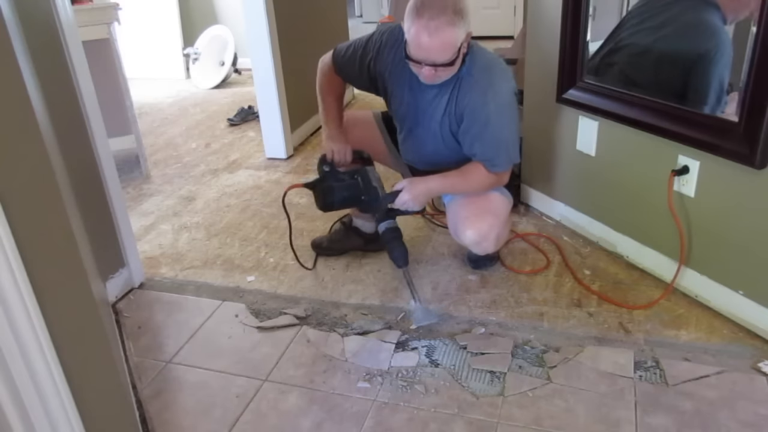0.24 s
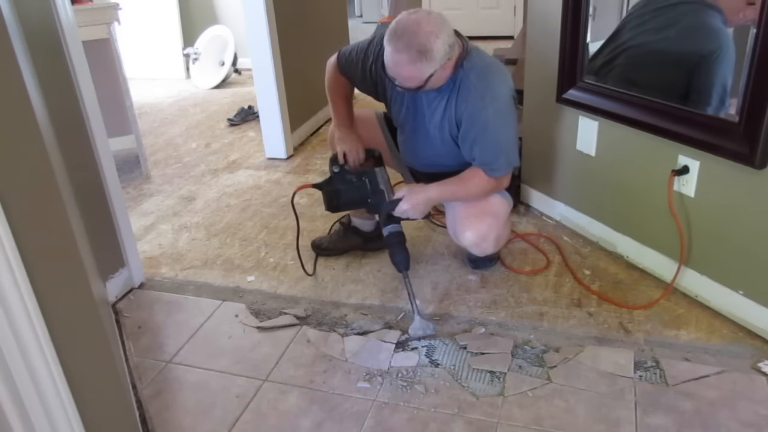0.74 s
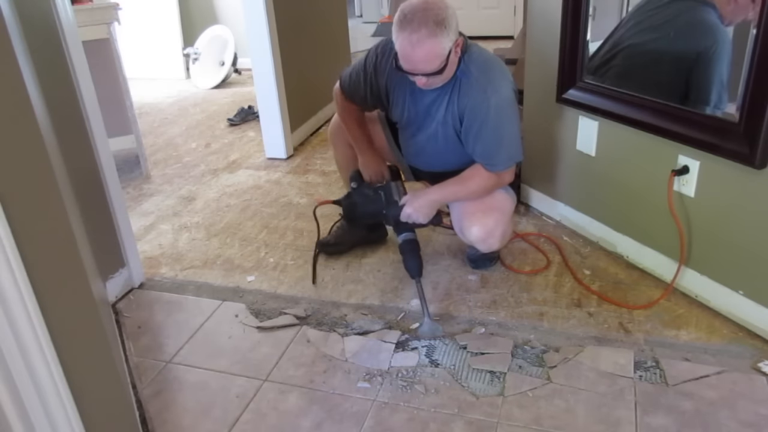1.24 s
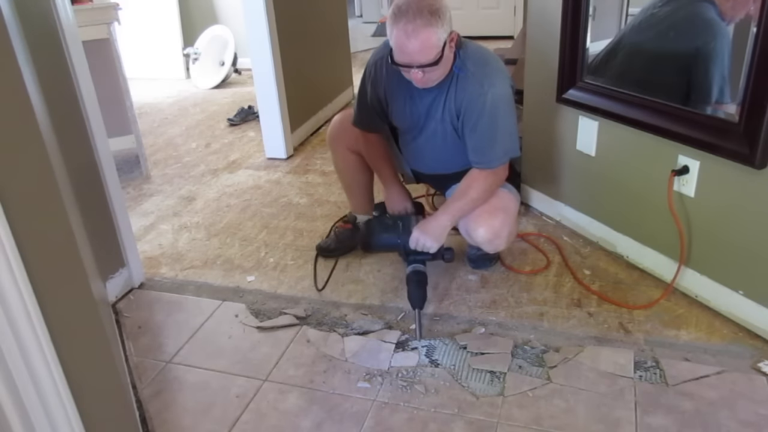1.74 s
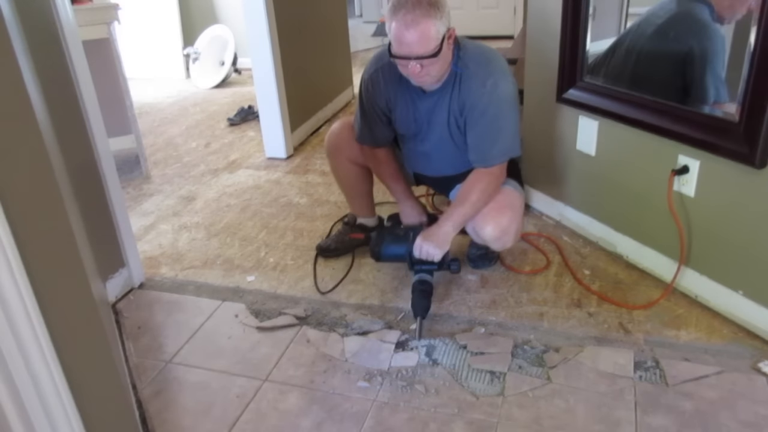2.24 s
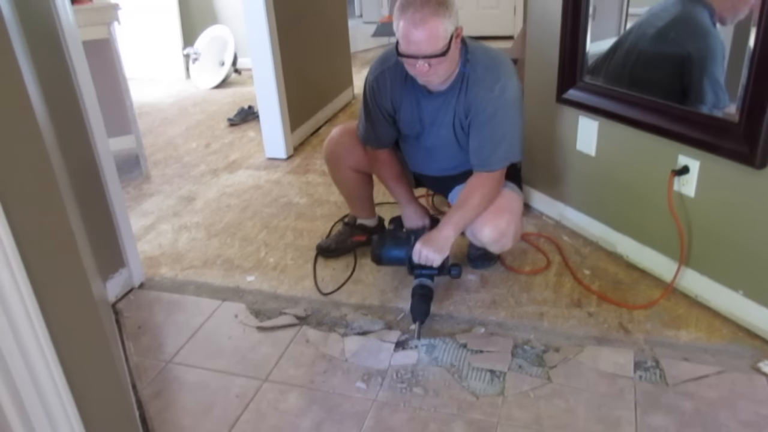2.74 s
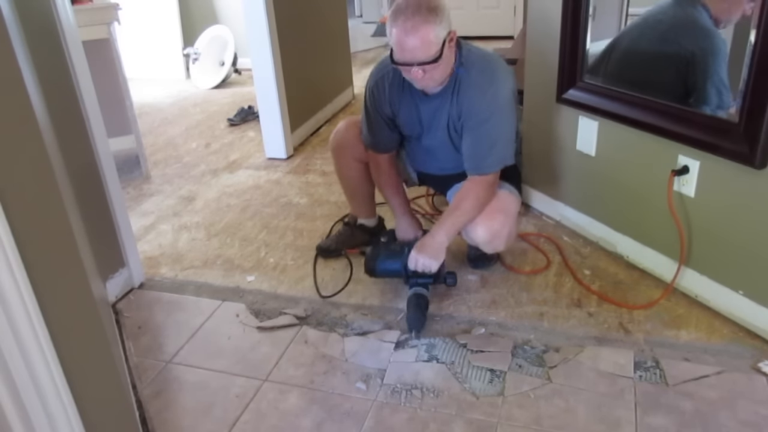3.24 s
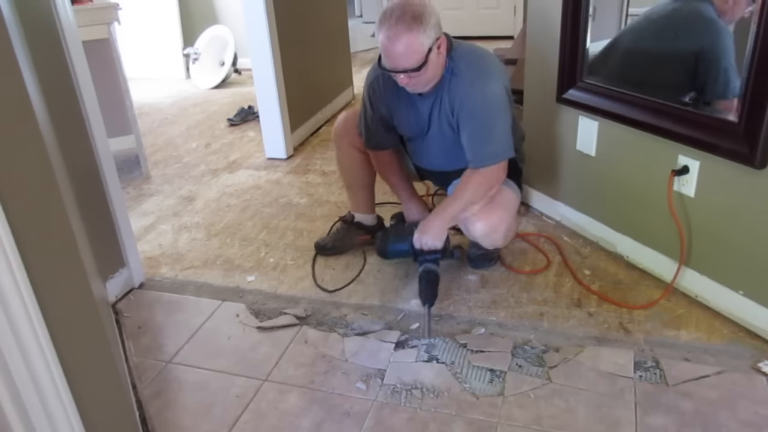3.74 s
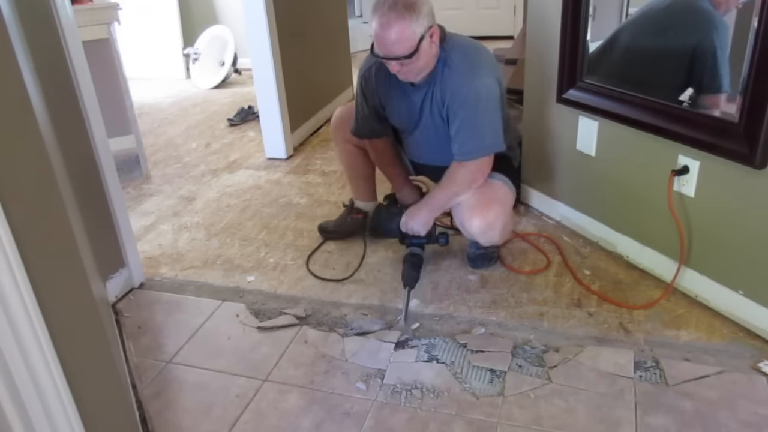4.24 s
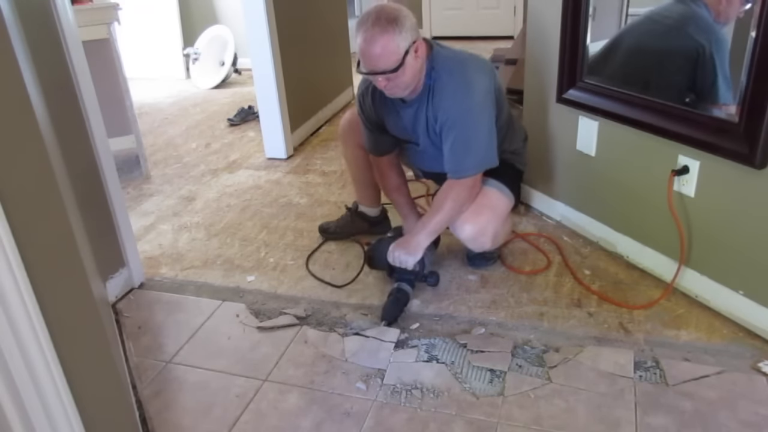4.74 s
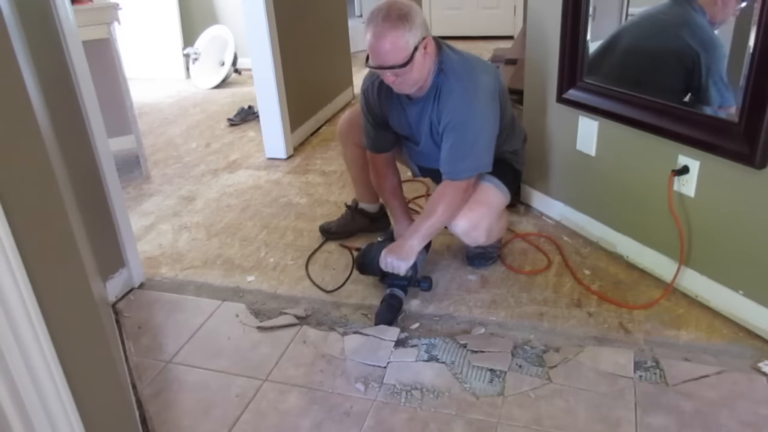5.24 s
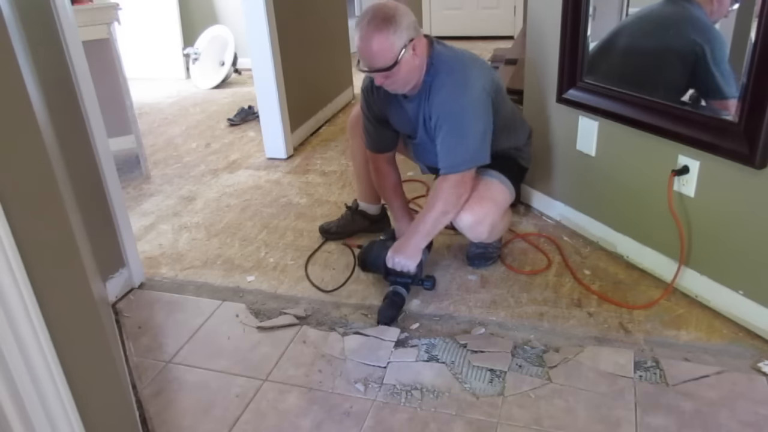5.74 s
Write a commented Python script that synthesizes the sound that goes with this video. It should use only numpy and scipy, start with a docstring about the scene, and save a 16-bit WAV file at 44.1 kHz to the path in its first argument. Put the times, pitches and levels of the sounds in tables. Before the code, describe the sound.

A whining power hammer starts, idles, and twice hammers rapidly into floor tile with booming, cracking and ringing steel, indoors.

```python
"""Shoes shuffle in a bare tiled room and one drags over grit; hard shards clack, with a dull thud under each.
Then the motor of an electric demolition hammer spins up, whirring, hissing and whining, and keeps running.
Twice the chisel bites, about 47 blows a second: the blows boom in the slab, crack tile and ring the steel.
Noise shaped by frequency makes air, grit, motor and rubble; sine tones make whine and drumming; sharp
impulses through resonances make the clacks, the snaps and, with noise, the ringing steel."""
import sys
import numpy as np
from scipy import signal
from scipy.fft import rfft, irfft, next_fast_len
from scipy.io import wavfile
from scipy.ndimage import uniform_filter1d, map_coordinates

SR = 44100
rng = np.random.default_rng(int(sys.argv[2]) if len(sys.argv) > 2 else 0)


def materialize(psi):
    """Save the field psi as 16-bit PCM at rate SR to the path in sys.argv[1].

    A 1-D psi becomes a single channel; in a 2-D psi each row is a channel.
    """
    bounded = np.clip(np.atleast_2d(psi).T, -1, 1)
    quanta = np.round(bounded * 32767).astype(np.int16)
    wavfile.write(sys.argv[1], SR, quanta)


N = 263718  # length in samples
TIME = np.arange(N) / SR  # seconds


def amp(db):
    """Turn dB into a plain gain."""
    return 10 ** (np.asarray(db) / 20)


def unit(x):
    """Scale x to an rms of 1."""
    return x / np.sqrt(np.mean(x ** 2) + 1e-20)


def noise():
    """White noise for the whole scene."""
    return rng.standard_normal(N)


def along(points, hz):
    """Read a curve of (Hz, value) points on a log frequency axis."""
    point_hz, values = np.transpose(points)
    return np.interp(np.log(hz + 1), np.log(point_hz + 1), values)


def curves(rows, outside=None):
    """Join the rows with straight lines: one curve for each column after the time."""
    s, *columns = np.transpose(rows)
    return [np.interp(TIME, s, column, outside, outside) for column in columns]


def wobble(rate):
    """A smooth random curve with `rate` random knots a second."""
    coarse = np.arange(0, N + 32, 32)
    knots = rng.standard_normal(int(N * rate / SR) + 4)
    smooth = map_coordinates(knots, [coarse * rate / SR])
    return np.interp(np.arange(N), coarse, smooth)


def swell(s, db, rise, fall):
    """A gain that climbs to db at s seconds and falls away, at rates in dB a second."""
    late = TIME - s
    return amp(db - np.where(late < 0, -rise * late, fall * late))


def filtered(x, response):
    """Multiply the spectrum of x by a response, a function of Hz."""
    size = next_fast_len(len(x) + SR // 2)
    hz = np.fft.rfftfreq(size, 1 / SR)
    return irfft(rfft(x, size) * response(hz), size)[:len(x)]


def coloured(x, spectrum):
    """Shape x by (Hz, dB) points, then scale it to an rms of 1."""
    return unit(filtered(x, lambda hz: amp(along(spectrum, hz))))


def ringing(x, modes):
    """Pass x through resonances side by side, with alternating sign; each is (Hz, width in Hz, dB)."""
    def response(hz):
        total = 0
        for k, (centre, width, db) in enumerate(modes):
            damping = 1j * hz * width
            total = total + (-1) ** k * amp(db) * damping / (centre * centre - hz * hz + damping)
        return total
    return filtered(x, response)


def struck(blows, shape):
    """Let every blow set off the same shape."""
    return signal.fftconvolve(blows, shape)[:N]


def burst(t60):
    """Noise that dies away by 60 dB in t60 seconds, scaled to an energy of 1."""
    t = np.arange(SR // 2) / SR
    x = amp(-60 * t / t60) * rng.standard_normal(len(t))
    return x / np.linalg.norm(x)


# The colour of the quiet room's air. Each row: frequency in Hz, relative level in dB per Hz.
AIR_COLOUR = [(15, -29), (25, -10), (49, -27), (225, -10.5), (734, -10), (1130, -9), (1430, -10.5),
              (9380, -33), (15200, -47)]
# Low bumps that reach the microphone. Each row: time in seconds, level in dB.
LOW_BUMPS = [(0.08, -35), (0.3, -37.5), (0.72, -39.5), (0.98, -49), (1.63, -44), (3.55, -34)]
BUMP_RISE_DB_PER_S, BUMP_FALL_DB_PER_S, RUMBLE_DB = 122, 93, -67
SHAKE_DB, SHAKE_FOLLOWS = -27.5, 0.44  # low shaking, and the power of the slab's boom that it follows


def background(boom):
    """Room air and low rumble: steady noise, plus deep noise that swells with bumps and the slab's boom."""
    deep_colour = [(12, -32), (25, -10.5), (60, -2.0), (110, -12), (200, -14), (400, -120)]  # Hz, dB
    deep = coloured(noise(), deep_colour)
    size = amp(RUMBLE_DB) + amp(SHAKE_DB) * boom ** SHAKE_FOLLOWS
    for s, db in LOW_BUMPS:
        size += swell(s, db, BUMP_RISE_DB_PER_S, BUMP_FALL_DB_PER_S)
    return amp(-43.5) * coloured(noise(), AIR_COLOUR) + size * deep


# The colour of grit under a shoe. Each row: frequency in Hz, relative level in dB per Hz.
GRIT_COLOUR = [(88, -41), (150, -10), (238, -11), (371, -17), (486, -11), (1600, -7.5), (1730, -8),
               (2310, -13.5), (2810, -16.5), (15000, -46.5)]
SCUFF_S, SCUFF_DB, SHUFFLE_DB = 0.273, -23, -45  # one drag of a shoe, over light shuffling until then
SCUFF_RISE_DB_PER_S, SCUFF_FALL_DB_PER_S = 356, 188


def scuff():
    """A shoe drags grit: noise in clumps stands for the many grains that scrape."""
    drag = swell(SCUFF_S, SCUFF_DB, SCUFF_RISE_DB_PER_S, SCUFF_FALL_DB_PER_S)
    shuffle = amp(SHUFFLE_DB) * (TIME < SCUFF_S)
    grains = amp(2.5 * wobble(146)) * noise()
    return (drag + shuffle) * coloured(grains, GRIT_COLOUR)


def through_tile(x, spread):
    """Bending waves carry treble faster: the delay is spread / sqrt(Hz) seconds."""
    return filtered(x, lambda hz: np.exp(-4j * np.pi * spread * np.sqrt(hz)))


# Single clacks of shards and steel, before the boosts below.
# Each row: time in seconds, crack level in dB, thud level in dB above the crack.
CLACK_TIMES = [(0.136, -25.5, -11), (0.4678, -27, -4.5), (0.557, 2, -19), (1.0445, -0.5, -13),
               (1.8797, -17, -0.5), (2.1136, -9.5, -5.5), (3.2431, 2, -17), (3.8226, -8, -0.5),
               (4.1989, -15.5, -4.5), (5.0379, 12, -31), (5.1665, 15, -18)]
# The resonances of a shard. Each row: frequency in Hz, width in Hz, level in dB.
SHARD_MODES = [(640, 175, -2), (1520, 410, -5), (2170, 640, -0.5), (2970, 390, 4), (4840, 2200, -10.5),
               (8550, 3600, -14.5), (13500, 2900, -23)]


def clacks():
    """A short crack goes through the shard's resonances, with a dull thud under it."""
    sharp, dull = np.zeros((2, N + SR))
    for s, db, thud_db in CLACK_TIMES:
        at = round(s * SR) - 30
        tail = slice(at, at + SR // 2)
        sharp[at] += amp(db + 22.5)
        sharp[tail] += amp(db + 18) * burst(0.02)
        dull[tail] += amp(db + thud_db + 38.0) * burst(0.2)
    crack = ringing(through_tile(sharp[:N], spread=0.13), SHARD_MODES)
    thud = ringing(dull[:N], [(233, 210, -0.45), (436, 620, 0.38)])
    return crack + thud


# How long the room rings. Each row: frequency in Hz, time in seconds to die away by 60 dB.
ROOM_DECAY = [(200, 1), (2000, 0.42), (10000, 0.39)]


def room(x):
    """The walls answer a little later, and each frequency of their answer dies at its own speed."""
    hz, t, bins = signal.stft(rng.standard_normal(SR), SR, nperseg=256)
    decay = amp(-60 * t / along(ROOM_DECAY, hz)[:, None])
    tail = signal.istft(bins * decay, SR, nperseg=256)[1]
    return struck(np.pad(x, (250, 0)), tail / np.linalg.norm(tail))


# The speed of the armature, the spinning part. Each row: time in seconds, speed in turns a second.
ARMATURE_SPEED = [(.76, 32.3), (.9, 105), (1.0, 156), (1.1, 183), (1.2, 227), (1.3, 254), (1.4, 265),
                  (1.51, 274), (1.73, 287), (2.1, 292), (3.1, 270), (3.3, 300), (3.62, 295), (4.08, 293.5),
                  (4.85, 294), (4.95, 250), (5.25, 290), (5.43, 302), (5.98, 290)]
# The motor coming up to its running level, which it then keeps; hiss and whine are boosted below.
# Each row: time in seconds, housing whirr in dB, fan and brush hiss in dB, whine in dB above the hiss.
MOTOR_LEVELS = [(0.72, -39.5, -74, 5), (0.8, -29.5, -57.5, 1), (0.88, -20.5, -43.5, 3),
                (0.93, -15.5, -43.5, 4), (1.03, -15.5, -34, -21), (1.09, -22, -41.5, 1.5),
                (1.14, -17.5, -42, 0), (1.3, -15.5, -37, -0.5), (1.98, -17, -38, 4),
                (2.06, -18.5, -39, 3.5)]
# The lines of the whine. Each row: multiple of the armature speed, level in dB,
# extra level in dB at full acceleration.
WHINE_LINES = [(12, -12, 18), (14, -7, 11), (15, -11, 0), (17, -3.5, 10), (18, -14, 0), (24, -7, -8),
               (30, -14, -12), (34, -13, -12), (38, -17, -12), (48, -22, -12), (50, -21, -12)]
# How well the casing radiates a tone. Each row: frequency in Hz, level in dB.
CASING_RESPONSE = [(900, 3.5), (1500, -13), (2300, 9.5), (2800, 3.5), (3250, 3), (3700, 2.5), (4600, -1),
                   (5400, 2.5), (6100, 2.5), (7000, -0.5), (15000, -9)]
# The colour of the housing whirr. Each row: frequency in Hz, relative level in dB per Hz.
WHIRR_COLOUR = [(88, -85), (150, -7.5), (194, -18.5), (222, -13.5), (524, -8), (861, -2.5), (1210, -2.5),
                (1570, 2.5), (2450, -2), (3280, -3.5), (5380, -12), (5970, -10), (9000, -29.5),
                (11700, -37), (19800, -120)]
# The colour of the fan and brush hiss. Each row: frequency in Hz, relative level in dB per Hz.
HISS_COLOUR = [(1470, -38), (2500, -2.5), (3210, 0.5), (5160, -6.5), (5610, -13), (6230, -10), (6620, -5),
               (10000, -9.5), (15200, -20)]
# Housing rattles during the start. Each row: frequency in Hz, width in Hz, level in dB.
HOUSING_MODES = [(1235, 33, 2), (1502, 24, 1), (1855, 38, 1), (2850, 31, 1), (3270, 77, 0.5)]
# Sounds of the start, before the boosts below.
# Each row: time in seconds, mains buzz in dB, housing rattle in dB.
START_LEVELS = [(0.76, -43, -51), (0.792, -41, -45), (0.816, -33, -30.5), (0.874, -38, -31),
                (0.938, -31, -20.5), (1.02, -41, -19.5), (1.054, -35, -40), (1.1, -46, -32)]
# blows shake the housing: whirr relative to the tile drumming, hiss (boosted below) to the cracking
SHAKEN_WHIRR_DB, SHAKEN_HISS_DB = -5.5, -25.5


def motor(crack, drumming):
    """Gears and fan make noise roughened once a turn; teeth, blades and bars add lines at speed multiples."""
    whirr_db, hiss_db, whine_db = curves(MOTOR_LEVELS) - 120 * (np.arange(N) < MOTOR_LEVELS[0][0] * SR)
    speed = curves(ARMATURE_SPEED)[0]
    turn = 2 * np.pi * np.cumsum(speed * (1 + 0.00229 * wobble(60))) / SR  # angle in radians
    rough = amp(1.06 * np.sin(turn) + 0.54 * wobble(40) + 1.1 * wobble(8))
    whirr = coloured(rough * noise(), WHIRR_COLOUR)
    hiss = coloured(rough * noise(), HISS_COLOUR)

    acceleration = uniform_filter1d(np.gradient(speed) * SR, 4000)
    effort = np.clip(acceleration / 330, 0, 1)
    whine = np.zeros(N)
    for k, db, extra_db in WHINE_LINES:
        line_db = db + extra_db * effort + along(CASING_RESPONSE, k * speed) + 1.5 * wobble(25)
        whine += amp(line_db) * np.sin(k * turn + k * k)
    # one gear mesh is rocked about twice per piston stroke, which splits its line
    mesh_db = 1.0 - 9.7 * effort + along(CASING_RESPONSE, 21 * speed) + 2.8 * wobble(9)
    whine += amp(mesh_db) * np.sin(21 * turn + 1.3 * np.sin(turn / 2.9))
    whine = amp(hiss_db + whine_db + 10.0) * whine

    buzz_db, rattle_db = curves(START_LEVELS, outside=-120)
    buzz = np.sin(2 * np.pi * 360 * TIME)
    rattle = unit(ringing(amp(2.6 * wobble(59.0)) * noise(), HOUSING_MODES))
    rush = np.hypot(amp(whirr_db), amp(SHAKEN_WHIRR_DB) * drumming) * whirr
    rush += amp(16.0) * np.hypot(amp(hiss_db), amp(SHAKEN_HISS_DB) * crack) * hiss
    start = amp(buzz_db + 3) * buzz + amp(rattle_db + 4.0) * rattle
    return rush + 0.5 * whine + 0.76 * room(whine) + start


# The two bites, one list of rows for each; later steps scale these gains.
# Each row: time in seconds, steel ring in dB, tile cracking in dB, slab boom in dB, tile drumming in dB.
BITE_LEVELS = [
    [(2.1, -35, -27, -36, -43), (2.118, -10.5, -19, -34, -35), (2.25, -3.5, -6.5, -17, -13.5),
     (2.4, -5, -4.5, -15.5, -13.5), (2.58, -0.3, -4, -12, -4.5), (2.88, -1.5, -4.5, -13.5, -2),
     (3.06, -3.5, -7, -13.5, -5.5), (3.2, -10, -7, -19.5, -11), (3.26, -8, -3, -17, -11)],
    [(4.61, -28, -24, -40, -19), (4.63, -17, -21, -42, -31), (4.73, -6.5, -8, -25, -20.5),
     (4.88, -0.1, -7.5, -15.5, -7.5), (5.08, 1, -4, -13, -1.5), (5.18, -4.5, -8, -15, -4),
     (5.23, -1.5, -9, -18, -3.5), (5.37, -10.5, -10, -20.5, -10.5), (5.4, -17, -14, -22, -11)],
]
# The idling tool leans on the floor for a moment.
# Each row: time in seconds, slab boom in dB, tile drumming in dB.
FLOOR_NUDGES = [(1.51, -36, -35), (1.77, -28.5, -35), (2.0, -37, -46), (3.55, -46, -41), (3.84, -32, -31),
                (4.18, -39, -35), (4.5, -36.5, -23)]
NUDGE_RISE_DB_PER_S, NUDGE_FALL_DB_PER_S = 197, 150
REST_S, REST_SLAB_DB, REST_TILE_DB = 1.43, -49, -38.5  # the idling tool begins to drum the floor
FLOOR_FADE_DB_PER_S = 132  # once the chisel lifts


def bite():
    """Gains of ring, cracking, boom and drumming; the floor fades after a bite and drums softly at idle."""
    ring, crack, slab, tile = np.sum([amp(curves(rows, outside=-120)) for rows in BITE_LEVELS], axis=0)
    rest = amp([[REST_SLAB_DB], [REST_TILE_DB]]) * (TIME > REST_S)
    floor = np.array([slab, tile]) + rest
    for rows in BITE_LEVELS:
        s, _, _, *floor_db = rows[-1]
        floor += [(TIME > s) * swell(s, db, 0, FLOOR_FADE_DB_PER_S) for db in floor_db]
    for s, *floor_db in FLOOR_NUDGES:
        floor += [swell(s, db, NUDGE_RISE_DB_PER_S, NUDGE_FALL_DB_PER_S) for db in floor_db]
    return ring, crack, floor[0], floor[1]


# The piston's pace: uneven as the chisel first digs in, a little faster off the floor.
# Each row: time in seconds, strokes so far.
STROKE_COUNT = [(1.4253, 0), (2.1133, 32), (2.3493, 43), (2.3961, 45), (2.481, 49), (2.5608, 53),
                (3.0966, 78), (3.2437, 85), (4.6278, 152), (5.3796, 187), (5.98, 216)]


def piston(scatter_db):
    """One impulse per stroke, of randomly scattered size."""
    s, count = np.transpose(STROKE_COUNT)
    at = np.round(np.interp(np.arange(count[-1]), count, s) * SR).astype(int)
    sizes = amp(scatter_db * rng.standard_normal(len(at)))
    return np.bincount(at, sizes, N)[:N]


# The floor's answer; the first four rows sound in the slab, the rest in the tile.
# Each row: multiple of the stroke rate, relative level in dB.
FLOOR_TONES = [(1, -15), (2, -7), (3, -6.5), (4, -6), (5, 1), (6, -6.5), (7, -4), (8, -5), (9, 2), (10, -2),
               (11, -5), (12, -4), (13, -10), (14, -6), (15, -5), (16, -7), (17, -22), (18, -15),
               (19, -9.5), (20, -16), (21, -32), (22, -14), (23, -13), (24, -14), (25, -13), (26, -15),
               (27, -26), (28, -17), (29, -10), (30, -28)]
# The colour of the slab's noise. Each row: frequency in Hz, relative level in dB per Hz.
SLAB_COLOUR = [(35, -49), (60, -19), (86, -29), (114, -1.5), (204, 5), (240, 5), (310, -34), (530, -120)]
# The colour of the tile's noise. Each row: frequency in Hz, relative level in dB per Hz.
TILE_COLOUR = [(120, -22), (200, -14.5), (244, -0.5), (325, -2), (428, 4.5), (557, -4), (681, -1),
               (1030, -9.5), (1400, -20.5), (2500, -7.5), (3250, -38), (5500, -120)]


def floor_boom(boom, drumming):
    """Strokes drum slab and tile: the tones drift as the contact point wanders, loose pieces add noise."""
    stroke = 2 * np.pi * curves(STROKE_COUNT)[0]  # angle in radians
    tones = []
    for k, db in FLOOR_TONES:
        level = amp(db + 2.4 * wobble(5))
        phase = k * stroke + rng.uniform(0, 2 * np.pi) + 0.6 * wobble(5)
        tones.append(level * np.sin(phase))
    slab = unit(sum(tones[:4])) + 0.5 * coloured(noise(), SLAB_COLOUR)
    tile = unit(sum(tones[4:])) + 0.52 * coloured(noise(), TILE_COLOUR)
    return boom * slab + drumming * tile


# The ring of the chisel. Each row: frequency in Hz, width in Hz, level in dB.
STEEL_MODES = [(7585, 19.3, 1), (7670, 65, 1), (7897, 59, -6.5), (7530, 247, -11), (8790, 25, -21),
               (9390, 89, -34), (11060, 230, -25.5), (11500, 130, -31), (14640, 150, -33)]
# The snap at the tip. Each row: frequency in Hz, width in Hz, level in dB.
TIP_MODES = [(3035, 1100, -9), (4734, 490, 1.5), (6500, 1100, -13), (11000, 610, -19), (14400, 500, -27)]
# The colour of crumbling tile. Each row: frequency in Hz, relative level in dB per Hz.
CRACK_COLOUR = [(300, -18), (2000, -5), (3500, 12), (4800, -9), (6500, -22), (10000, -21), (15000, -37)]
# Blows that split a tile, louder than the rest. Each row: time in seconds, level in dB before a boost.
SPLIT_BLOWS = [(2.242, -1), (2.328, -2), (2.3954, -5), (2.438, 4), (2.5811, 5), (2.624, 5), (2.667, 7),
               (2.7323, 8.5), (3.096, 2), (3.1198, 6), (3.2217, 1.5), (4.7607, -3), (4.9265, 5.5),
               (4.949, 5), (4.9703, 6), (5.1455, 4), (5.1892, 7)]
SNAP_DB, CRUMBLE_DB = 31, -21  # relative to the tile cracking


def chisel(force, crack):
    """Each blow snaps at the tip and renews the steel's ring, which chatter keeps feeding between blows."""
    blows = piston(scatter_db=0.37)
    fade = amp(-60 * np.arange(2000) / SR / 0.057)
    chatter = unit(struck(blows, fade)) * noise()
    ring = ringing(amp(16) * force * (0.47 * unit(blows) + chatter), STEEL_MODES)

    snaps = amp(SNAP_DB + 3.3 * wobble(10)) * crack * piston(scatter_db=1.5)
    for s, db in SPLIT_BLOWS:
        snaps[round(s * SR)] += amp(db + 26.5)
    snaps = snaps + 0.21 * np.roll(snaps, 230)  # the tip bounces once, 5 ms later
    snap_sound = ringing(through_tile(snaps, spread=0.09), TIP_MODES)
    crumble = coloured(amp(3 * wobble(80)) * noise(), CRACK_COLOUR)
    return ring + snap_sound + amp(CRUMBLE_DB) * crack * crumble


def scene():
    """Mix tool, chisel and small knocks, each with its share of the room."""
    ring, crack, boom, drumming = bite()
    shoe, hits, steel = scuff(), clacks(), chisel(ring, crack)
    wet = room(amp(-2.5) * hits + amp(-2.0) * steel + amp(-7.0) * shoe)
    tool = motor(crack, drumming) + floor_boom(boom, drumming)
    return (background(boom) + shoe + hits + tool + steel + wet)[None]


def smoothed_power(power, seconds):
    """A running average that forgets older sound over the given time."""
    keep = np.exp(-1 / (seconds * SR))
    return signal.lfilter([1 - keep], [1, -keep], power)


LISTEN_S, CEILING_DB, SQUEEZE, RECOVER_DB_PER_S = 0.056, -16, 0.85, 3.5


def slow_gain(x):
    """Listen mostly to the treble, turn down what passes the ceiling and creep back up."""
    treble = np.diff(x, prepend=0)
    level_db = 10 * np.log10(smoothed_power(treble ** 2, LISTEN_S) + 1e-12)
    need_db = -SQUEEZE * np.clip(level_db - CEILING_DB, 0, None)
    climb_db = RECOVER_DB_PER_S * TIME
    return amp(climb_db + np.minimum.accumulate(need_db - climb_db))


TOP_HZ = 15140  # nothing is kept from here up


def record(dry):
    """A slow gain control ducks loud blows, a quick one lets a first click through; peaks round off."""
    x = dry[0] * slow_gain(dry[0])
    level = np.sqrt(smoothed_power(x ** 2, 0.0023))
    held = x / (1 + (level / 0.3) ** 4) ** 0.18
    soft = held / (1 + np.abs(held / 0.95) ** 6) ** (1 / 6)
    return filtered(soft, lambda hz: hz < TOP_HZ)[None]


dry = scene()
out = record(dry)
materialize(out)
```